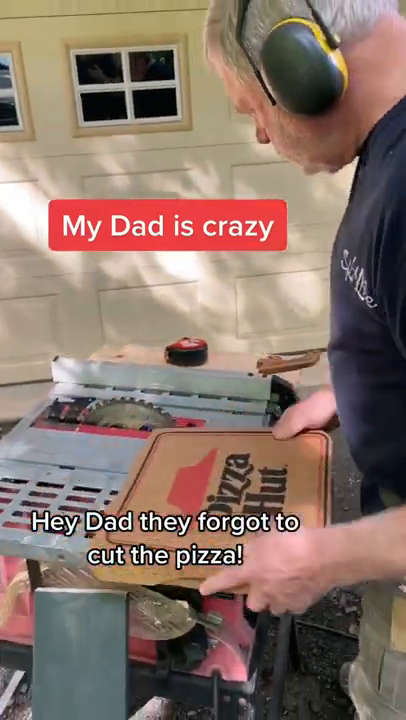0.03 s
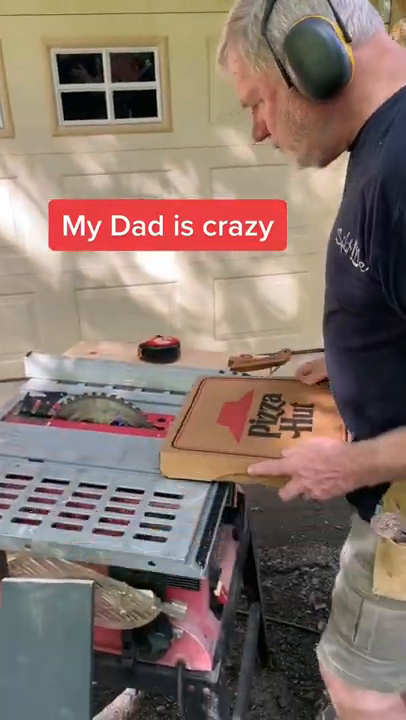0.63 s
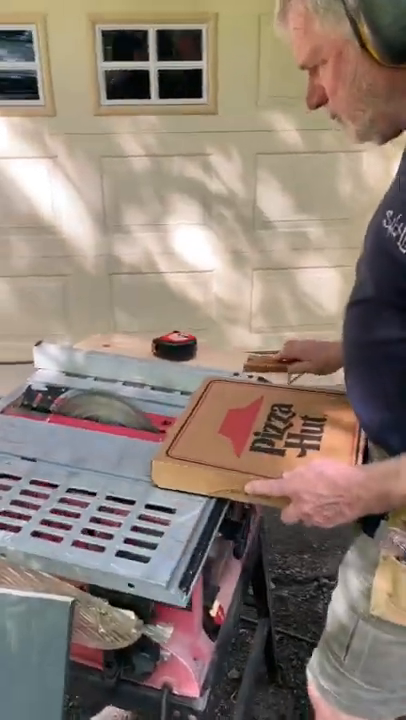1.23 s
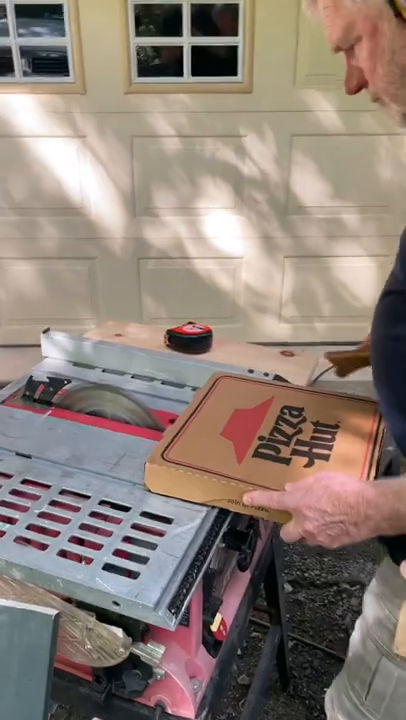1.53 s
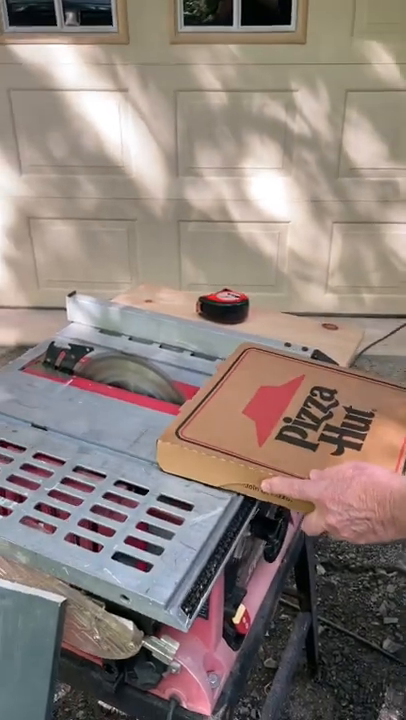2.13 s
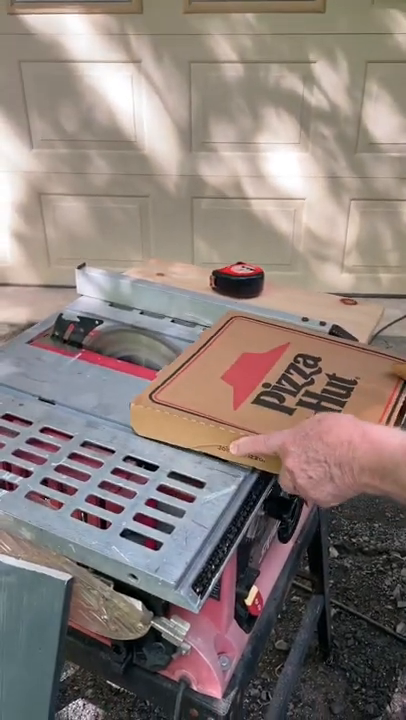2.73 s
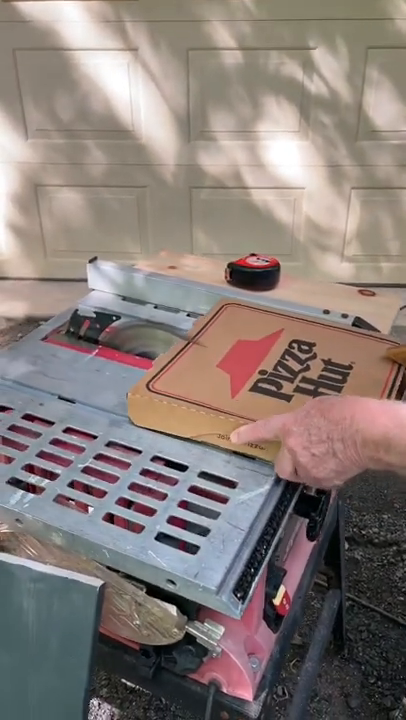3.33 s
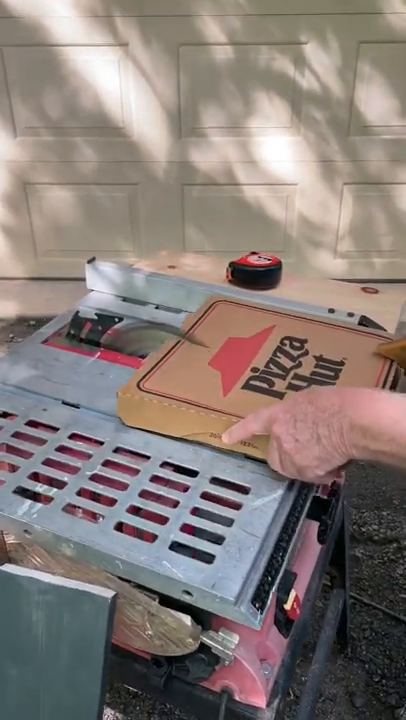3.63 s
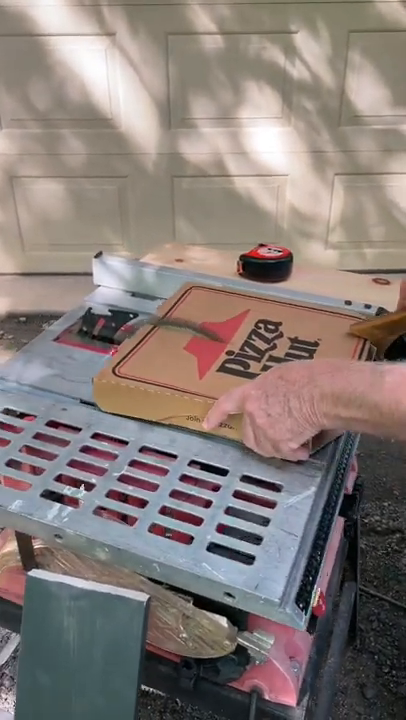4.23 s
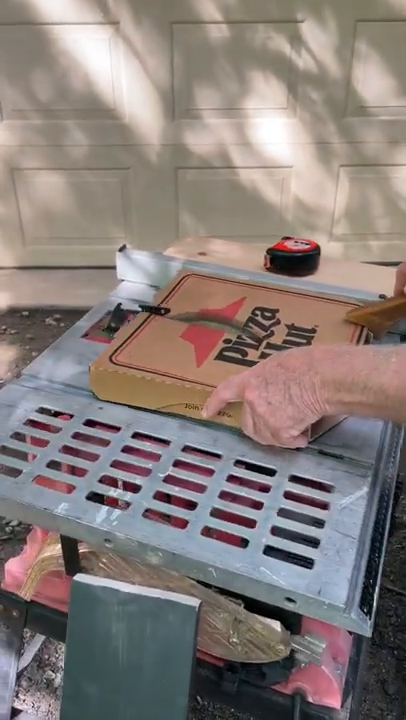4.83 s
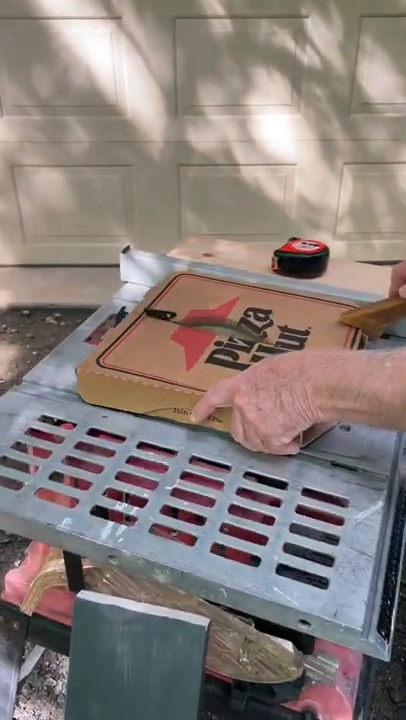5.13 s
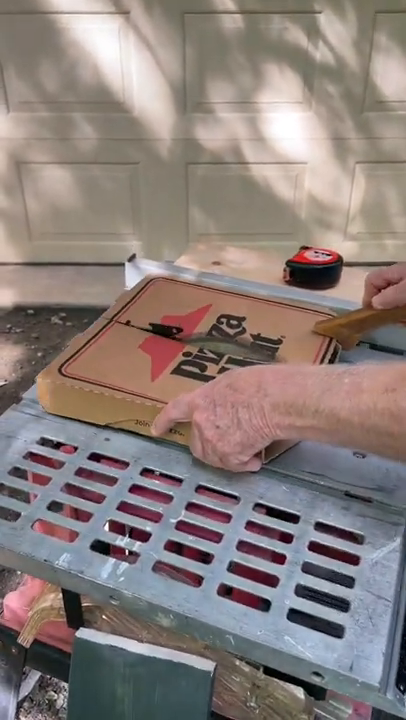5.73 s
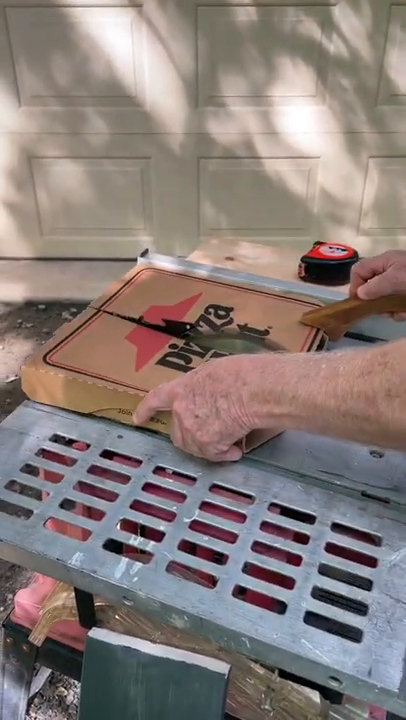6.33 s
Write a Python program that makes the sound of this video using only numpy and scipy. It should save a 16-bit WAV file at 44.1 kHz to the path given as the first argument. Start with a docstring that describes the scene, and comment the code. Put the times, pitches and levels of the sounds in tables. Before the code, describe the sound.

Against a faint, low outdoor background, a cardboard box scrapes softly over a ribbed metal table, with small squeaks and light knocks, until about 0.7 seconds. At 0.8 seconds a switch snaps and a table saw starts with a thud, a loud electric hum and a brief metallic ring. The motor roars upward in pitch, its gears grinding and howling. At 2.5 seconds it reaches full speed: the roar falls back abruptly, and a short, loud shriek settles into a high, wavering whine over steady rushing air. From about 3.8 seconds the blade enters the box, and the whine surges several times, most strongly near 4.7 seconds. A rasping, buzzing sound of shredding cardboard grows while the pitch sags slightly. The saw is still cutting at the end, around 6.4 seconds. Everything is heard in stereo from a hand-held microphone about a metre away.

```python
"""Cutting cardboard on a table saw

Outdoors, a cardboard box slides over a ribbed saw table. The switch snaps and the geared motor
starts with a hum and a roar. At full speed the roar falls back and the forty teeth of the blade
whine as they chop the air. The box is fed in, the teeth shred it, and the cut drags the speed down.
A hand-held pair of closely spaced microphones listens from about a metre away."""
import sys
import numpy as np
from scipy import signal
from scipy.fft import irfft
from scipy.io import wavfile
from scipy.ndimage import uniform_filter1d, map_coordinates

SR = 44100
rng = np.random.default_rng(int(sys.argv[2]) if len(sys.argv) > 2 else 0)


def to_wav(s):
    """Save 16-bit WAV."""
    ch = np.atleast_2d(s).T  # columns
    pcm = np.round(np.clip(ch, -1, 1) * 32767)  # PCM
    wavfile.write(sys.argv[1], SR, pcm.astype(np.int16))


N = 285327
TIME = np.arange(N) / SR
FREQS = np.maximum(np.arange(N // 2 + 1) * SR / N, 1)
SIDES = np.array([[1], [-1]])   # left, right

TEETH, GEAR_RATIO = 40, 41 / 9   # the motor shaft turns GEAR_RATIO times per blade turn
MAINS_HZ, SWITCH_ON_S, UP_TO_SPEED_S = 60, 0.8, 2.5
MAINS_ANGLE = 2 * np.pi * MAINS_HZ * TIME

# stereo width of the yard, the sliding box and the start: f/Hz, side compared with middle/dB
START_WIDTH = [(60, -42), (200, -79), (360, -12.5), (640, -9.5), (2100, -10.5), (3800, -4), (6900, 0),
               (12500, 6)]
# stereo width of the rushing air and the cut: f/Hz, side compared with middle/dB
RUNNING_WIDTH = [(60, -49), (360, -27.5), (2200, -100), (2800, 1.5), (4200, -9), (6900, 2), (9000, 4),
                 (12500, 47)]


def from_db(db):
    """Turn decibels into a gain."""
    return 10 ** (np.asarray(db) / 20)


def rms_one(x):
    """Scale a signal so that its average strength (rms) is 1."""
    return x / np.sqrt(np.mean(np.abs(x) ** 2) + 1e-20)


def in_time(rows):
    """Join (time, values...) points with straight lines, one curve per value."""
    times, *columns = np.transpose(rows)
    return [np.interp(TIME, times, column) for column in columns]


def colour(points):
    """Gain at every frequency, from points of f/Hz, level/dB."""
    hz, db = np.transpose(points)
    return from_db(np.interp(np.log(FREQS), np.log(hz), db))


def peak(x, centre, width):
    """A hump that is 1 at its centre and half as high half a width away."""
    return 1 / (1 + (2 * (x - centre) / width) ** 2)


def swell(start, length):
    """A smooth rise and fall: half a sine wave."""
    return np.sin(np.pi * np.clip((TIME - start) / length, 0, 1))


def envelope(start, attack_s, hold_s, fall_db_per_s):
    """Rise, hold until hold_s after the start, then die away."""
    age = TIME - start
    return np.clip(age / attack_s, 0, 1) * from_db(-fall_db_per_s * np.maximum(age - hold_s, 0))


def white():
    """The spectrum of white noise."""
    return rng.standard_normal(len(FREQS)) + 1j * rng.standard_normal(len(FREQS))


def drift(rate_hz, step=32):
    """A random wander of strength 1, mostly slower than rate_hz."""
    hz = np.arange(N // step) * SR / N
    coarse = irfft(rng.standard_normal((len(hz), 2)) @ [1, 1j] / (1 + (hz / rate_hz) ** 2))
    return rms_one(np.interp(np.arange(N) * len(coarse) / N, np.arange(len(coarse)), coarse))


def unsteady():
    """A restless gain that roughens a tone."""
    return rms_one(1 + .33 * drift(25))


def flutter(rate_hz):
    """A random gain and phase that smear a tone into a narrow band of noise."""
    return rms_one(drift(rate_hz) + 1j * drift(rate_hz))


def partials(angle, tones):
    """Tones at whole multiples of a rotation, each wavering in level on its own."""
    return sum(np.sqrt(2) * from_db(db + 2.5 * drift(7)) * np.cos(k * angle + rng.uniform(0, 2 * np.pi))
               for k, db in tones)


def resonant_noise(hz, width_hz):
    """Noise of strength 1, gathered around one pitch."""
    off_pitch = (FREQS ** 2 - hz ** 2) / (FREQS * width_hz)
    return rms_one(irfft(white() / (1 + off_pitch ** 2), N))


def saw_noise(spectrum, width, direct=0.98, lean=0.85):
    """Stereo noise coloured by the cabinet; the lows lean left and the treble arrives there first."""
    # resonances of cabinet and table: f/Hz, width/Hz, boost/dB
    cabinet = [(296, 87, -2), (745, 82, 6), (832, 39, -2.5), (1250, 35, -0.5)]
    shape = colour(spectrum) * from_db(sum(db * peak(FREQS, hz, wide) for hz, wide, db in cabinet))
    shared = lean / (1 + (FREQS / 1200) ** 4) + 1j * np.sqrt(direct) * np.minimum(FREQS / 8000, 1)
    diffuse = np.sqrt(np.clip(1 - np.abs(shared) ** 2, 0, 1))
    source = white()
    mid = irfft(shape * source, N)
    side = irfft(shape * colour(width) * (shared * source + diffuse * white()), N)
    return (mid + side * SIDES) / np.std(mid)


def shifting(x, depth_db, count=25, size=512):
    """Patches of the spectrum, some 150 Hz wide and `count` frames of 6 ms long, swell and fade."""
    frames = signal.stft(x, nperseg=size)[2]
    patches = rng.standard_normal(frames.shape[-2:])
    for _ in range(2):
        patches = uniform_filter1d(uniform_filter1d(patches, size=2, axis=0), size=count, axis=1)
    gain = rms_one(from_db(depth_db * np.tanh(rms_one(patches))))
    return signal.istft(frames * gain, nperseg=size)[1][..., :N]


def yard(level_db=-59):
    """A faint, low outdoor background."""
    # its spectrum: f/Hz, relative level/dB
    spectrum = [(30, -26), (110, 11.5), (400, -6), (3000, -30), (12000, -40)]
    return from_db(level_db) * saw_noise(spectrum, START_WIDTH)


def sliding_box(level_db=-47, stop_s=0.66, fall_db_per_s=103):
    """Cardboard scrapes along until it comes to rest, and the table's ribs sing under it."""
    # harder pushes on the box: start/s, length/s, level/dB
    pushes = [(0.127, 0.32, -47.5), (0.567, 0.065, -57)]
    # spectrum of the scrape: f/Hz, relative level/dB
    spectrum = [(100, 4), (400, 1), (850, -2), (1300, -5), (5000, -15), (12000, -29.5)]
    # gliding notes of the ribs: start/s, length/s, first f/Hz, last f/Hz, level/dB
    zips = [(0.152, 0.065, 750, 936, -45), (0.193, 0.037, 557, 620, -44), (0.247, 0.139, 442, 370, -46.5),
            (0.45, 0.12, 2100, 1650, -50)]
    level = from_db(level_db - fall_db_per_s * np.maximum(TIME - stop_s, 0))
    level = level + sum(from_db(db) * swell(start, length) for start, length, db in pushes)
    level = level * from_db(1.3 * drift(60))
    out = level * shifting(saw_noise(spectrum, START_WIDTH), depth_db=5, count=5)
    for start, length, from_hz, to_hz, db in zips:
        pitch = np.interp(TIME, [start, start + length], [from_hz, to_hz]) * (1 + 0.015 * drift(154))
        tone = np.sqrt(2) * np.sin(2 * np.pi * np.cumsum(pitch) / SR)
        out = out + from_db(db) * swell(start, length) * unsteady() * tone
    return out


def blade_rings(width_hz=60, rasp=0.14):
    """The blade's plate rings when jolted or pinched, rasping as it chatters."""
    # each ring: start/s, length/s, f/Hz, level/dB
    rings = [(0.0, 0.25, 3620, -64), (0.804, 0.055, 2350, -28), (0.807, 0.1, 4450, -29.5),
             (1.024, 0.072, 4450, -28.5), (0.848, 0.57, 4400, -33.5), (4.792, 0.13, 3710, -41),
             (4.793, 0.12, 4070, -36)]
    ringing = sum(from_db(db) * swell(start, length) * resonant_noise(hz, width_hz)
                  for start, length, hz, db in rings)
    return ringing * rms_one(1 + rasp * drift(90))


def knocks():
    """The box knocks on the table, the switch snaps and thuds, and the motor's brushes spit."""
    # short bursts of noise: t/s, f/Hz, width/Hz, decay/s, level/dB
    bursts = [(0.43, 745, 120, 0.012, -35.5), (0.564, 580, 300, 0.03, -41), (0.581, 800, 456, 0.018, -39),
              (0.631, 195, 260, 0.018, -38), (0.796, 4360, 7000, 0.0017, -27.5),
              (0.793, 600, 900, 0.0078, -32), (0.802, 710, 696, 0.015, -19),
              (0.808, 5470, 4000, 0.014, -43), (0.894, 5730, 3000, 0.021, -29)]
    out = 0
    for start, hz, width_hz, decay, db in bursts:
        age = np.maximum(TIME - start, 0) / decay
        out = out + from_db(db) * 2 * (np.exp(-age) - np.exp(-5 * age)) * resonant_noise(hz, width_hz)
    return out


def start_up(level_db=-14.5, hold_s=0.18, sag_db_per_s=28.5):
    """The starting current hums in the windings and shakes the cabinet twice per mains cycle."""
    # spectrum of the shaking cabinet: f/Hz, relative level/dB
    spectrum = [(30, -20), (170, -6.5), (320, 2.5), (430, -9.5), (830, -2), (1050, -6.5), (1600, -7),
                (2300, -5.5), (3100, -17.5), (6000, -55)]
    # hum of the windings: multiple of the mains frequency, relative level/dB
    hum_tones = [(2, -21), (3, -7), (4, -13.5), (5, -5), (6, -12), (8, -16.5), (9, -16), (12, -17.5),
                 (13, -14), (14, -14)]
    rattle = saw_noise(spectrum, START_WIDTH) * (1 + .25 * np.cos(2 * MAINS_ANGLE))
    hum = partials(MAINS_ANGLE + .02 * drift(15), hum_tones)
    level = from_db(level_db - sag_db_per_s * np.clip(TIME - SWITCH_ON_S, 0, hold_s))
    return level * envelope(SWITCH_ON_S, 0.028, hold_s, fall_db_per_s=65) * (rattle + hum)


def blade_speed(aim_turns_per_s=82.8, half_way_s=0.352):
    """Blade turns per second: the climb flattens out until it meets the working speed."""
    # teeth passing at working speed, dragged down by the cut: t/s, f/Hz
    tooth_rate = [(2.52, 2756), (2.65, 2777), (2.8, 2782), (3.2, 2783), (3.6, 2791), (3.9, 2778),
                  (4.55, 2736), (5.0, 2688), (5.6, 2648), (6.05, 2640), (6.25, 2661), (6.44, 2669)]
    age = np.maximum(TIME - SWITCH_ON_S, 0)
    return np.minimum(aim_turns_per_s * age / (age + half_way_s), in_time(tooth_rate)[0] / TEETH)


def gear_howl(width_hz=80):
    """The gearbox howls: a narrow band of noise whose pitch sags and climbs again."""
    # path of the howl: t/s, f/Hz, relative level/dB
    path = [(0.9, 2340, 3), (1.15, 2150, 12), (1.65, 1984, 0), (2.05, 2430, -6)]
    hz, db = in_time(path)
    angle = 2 * np.pi * np.cumsum(hz * (1 + .03 * drift(8))) / SR
    return from_db(db) * np.sqrt(2) * np.real(flutter(width_hz) * np.exp(1j * angle))


def gear_grinding(shaft, repeat=0.6, track_turns_per_s=200):
    """Gear noise glides up with the shaft's speed; part of it comes back every blade turn."""
    # noise bands: centre/multiples of shaft speed, width/multiples, relative level/dB
    bands = [(4.1, 0.6, -3), (5.9, 0.8, -4), (7.4, 0.7, -1), (8.55, 0.6, -1.5), (13.4, 1.6, -7),
             (20.5, 2, -12)]
    multiples = FREQS / track_turns_per_s
    shape = sum(from_db(db) * peak(multiples, k, wide) for k, wide, db in bands)
    recurring = 1 / (1 - repeat * np.exp(-2j * np.pi * multiples * GEAR_RATIO))
    track = irfft(white() * shape * recurring, N)
    position = shaft / (2 * np.pi) * SR / track_turns_per_s   # a faster shaft reads the noise faster
    return rms_one(map_coordinates(track, [position], order=1, mode="wrap"))


def motor_roar(shaft, pace, strain, torque, inrush_db=-24, roar_db=-22):
    """The brushes spark in the first rush of current; then the straining motor roars up with speed."""
    # spectrum of the brush noise: f/Hz, relative level/dB
    spectrum = [(150, -15), (400, -11), (760, -1), (1500, 0), (2100, -2), (2900, -0.5), (4000, -3),
                (5400, -6), (8000, -14), (11000, -21), (13000, -40)]
    inrush = from_db(inrush_db) * envelope(SWITCH_ON_S, 0.025, hold_s=0.15, fall_db_per_s=168)
    level = np.hypot(inrush, from_db(roar_db) * strain * pace ** 0.96)
    # stand, table and hollow cabinet each boom at their own pitch
    rumble = (from_db(-28) * resonant_noise(66, 22) + from_db(-29.5) * resonant_noise(140, 43)
              + from_db(-13.5) * resonant_noise(313, 225))
    gearbox = from_db(-14) * gear_howl() + from_db(-6) * gear_grinding(shaft)
    brushes = shifting(saw_noise(spectrum, START_WIDTH), depth_db=5, count=14)
    sparking = 1 + .1 * np.cos(2 * MAINS_ANGLE)
    return level * (brushes + torque * (rumble + gearbox)) * sparking


def air_rush(pace, strain, bite, level_db=-30.5, strain_db=6.5, covered_db=-2.5):
    """Air from fan and blade grows with speed: louder under strain, softer as the box covers it."""
    # spectrum of the air: f/Hz, relative level/dB
    spectrum = [(30, -44), (62, -8.5), (95, -54), (135, -6), (190, -14.5), (330, 0), (470, -4.5),
                (760, -4.5), (1250, 1), (1600, -2.5), (2500, 0.5), (3050, -5), (5000, -2.5), (7800, -10),
                (9200, -17.5), (11000, -31), (13000, -72)]
    air = shifting(saw_noise(spectrum, RUNNING_WIDTH), depth_db=2.4) * from_db(.5 * drift(7.3))
    return from_db(level_db + strain_db * strain + covered_db * bite) * pace ** 2.3 * air


def strain_whines(shaft, shaft_hz, torque, gain_db=-2):
    """The straining shaft turns unevenly; its tones swell as they climb through housing resonances."""
    # each tone: multiple of shaft speed, relative level/dB, resonance f/Hz, width/Hz
    tones = [(2, -39, 595, 50), (4, -30, 1215, 90), (7, -29, 1920, 240), (8, -33.5, 2080, 300),
             (9, -33, 2560, 260), (12, -30.5, 3380, 300), (14, -33, 3200, 300)]
    out = 0
    for k, db, hz, wide in tones:
        rasp = rms_one((1 + flutter(45)) * from_db(1.5 * drift(10)))
        tone = np.sqrt(2) * np.real(rasp * np.exp(1j * k * shaft))
        out = out + from_db(db) * tone / np.hypot(1, 2 * (k * shaft_hz - hz) / wide)
    return from_db(gain_db) * torque * out


def motor_tones(shaft, pace, strain, bite):
    """The windings hum, while the fan and the commutator (the motor's turning contacts) sing."""
    # hum while speeding up: multiple of the mains frequency, relative level/dB
    strain_hum = [(2, -37), (6, -37)]
    # hum at top speed: multiple of the mains frequency, level/dB
    running_hum = [(4, -55)]
    # fan and commutator: multiple of shaft speed, level running free/dB, level at full bite/dB
    tones = [(2, -50, -51), (3, -46.5, -48), (4, -56, -42.5), (7, -58, -42), (12, -51.5, -60),
             (14, -48, -50)]
    hum = strain * np.sqrt(1 - pace) * partials(MAINS_ANGLE, strain_hum)   # current falls with speed
    loaded = [(k, free_db + bite * (bite_db - free_db)) for k, free_db, bite_db in tones]
    return hum + pace ** 2 * (unsteady() * partials(shaft, loaded) + partials(MAINS_ANGLE, running_hum))


def unbalanced_shaft(shaft, shaft_hz, pace, torque, bite, level_db=-54.5, boom_hz=296):
    """The lopsided shaft's tone grows with speed and load, and swells where the cabinet booms."""
    load_db = 27.5 * torque + 16 * bite
    boom_db = 8 * peak(shaft_hz, boom_hz, width=19.4)
    level = from_db(level_db + load_db + boom_db + 0.25 * drift(11)) * pace ** 3.3
    return level * np.sqrt(2) * np.sin(shaft)


def motor(blade, speed, bite, easing_share=0.045):
    """The motor strains until it is up to speed; its torque (twisting force) eases near the top."""
    shaft, shaft_hz = blade * GEAR_RATIO, speed * GEAR_RATIO
    pace = speed / speed.max()
    strain = envelope(SWITCH_ON_S, 0.025, hold_s=UP_TO_SPEED_S - SWITCH_ON_S, fall_db_per_s=379)
    torque = strain * np.minimum((1 - pace) / easing_share, 1)
    return (motor_roar(shaft, pace, strain, torque) + air_rush(pace, strain, bite)
            + strain_whines(shaft, shaft_hz, torque) + motor_tones(shaft, pace, strain, bite)
            + unbalanced_shaft(shaft, shaft_hz, pace, torque, bite))


def free_running(blade, bite):
    """Tones of gear and blade fade in near full speed and give way as the teeth bite."""
    # each tone: multiple of blade speed, level/dB
    tones = [(18, -52), (33, -45), (41, -48), (60, -53), (79, -45.5)]
    return (1 - bite) * np.interp(TIME, [1.5, UP_TO_SPEED_S], [0, 1]) * partials(blade, tones)


def tooth_whine(blade, start_s=2.494, attack_s=0.013, fade_hz=22):
    """Teeth chop the air: a shriek, then a whine that wavers with echoes off moving surfaces."""
    # three tones, lowest first: steady level/dB, shriek level/dB, left lead/rad, fading depth/0-1
    tones = [(-29.5, -12.5, 0.36, 0.14), (-30.5, -31, 0.85, 0.29), (-33, -26.5, 2.17, 0.7)]
    # the lowest tone surges as the box passes over the blade: start/s, length/s, level/dB
    surges = [(3.783, 0.31, -30.5), (4.204, 0.34, -26), (4.517, 0.073, -30), (4.592, 0.17, -21),
              (4.738, 0.17, -24.5), (5.946, 0.095, -36), (6.133, 0.11, -29)]
    # dips (swells if negative): t/s, half length/s, loss of tone 1/dB, of tone 2/dB, of tone 3/dB
    dips = [(2.563, 0.025, -1, 13, 6), (2.68, 0.035, 5, 1, -6.5), (2.75, 0.051, -2, 9, -7),
            (2.81, 0.019, 8, -6, 0), (2.885, 0.033, 10, -2, -1), (3.03, 0.086, 5.5, -1, 1.5),
            (3.253, 0.065, 28, 2.5, 8), (3.4, 0.047, 6, 15, 5), (3.85, 0.14, 0.5, 5, 4.5),
            (4.05, 0.031, 0.5, 28, -4), (4.145, 0.016, -0.5, 18, 3), (4.45, 0.011, -1, 13, -9),
            (4.505, 0.018, 7, -4, 5), (4.603, 0.017, 10, 8, -5), (4.795, 0.027, 3.5, 9, 6),
            (4.912, 0.036, 2.5, 18, 2), (5.0, 0.085, -2.5, 7, 9), (5.48, 0.19, -1.5, -1, -4),
            (5.8, 0.14, 23, -1, 3), (5.99, 0.04, 0, 12, -2), (6.107, 0.033, 12, 1, 5),
            (6.26, 0.028, 8, 24, 1), (6.45, 0.042, -1.5, 26, 5)]
    # the lowest tone shifts sideways as the microphones move: t/s, left minus right/dB
    sway = [(2.5, -1), (2.64, -9), (3.13, -2), (3.42, -1.5), (5.38, -4.5), (5.51, -15), (5.92, 10.5),
            (6.3, -1.5)]
    onset = np.clip((TIME - start_s) / attack_s, 0, 1)
    shriek = envelope(start_s, attack_s, hold_s=attack_s, fall_db_per_s=143)
    surge = sum(from_db(db) * swell(start, length) for start, length, db in surges)
    loss_db = sum(np.outer(losses, np.exp(-((TIME - t) / half) ** 2)) for t, half, *losses in dips)
    balance = rms_one(from_db(SIDES * in_time(sway)[0] / 2))
    tooth_angle = TEETH * blade + .05 * drift(60)
    out = 0
    for k, (steady_db, shriek_db, lead, depth) in enumerate(tones, 1):
        level = from_db(steady_db) * onset + from_db(shriek_db) * shriek
        if k == 1:
            level = (level + surge) * balance
        fading = rms_one(1 + depth * (drift(fade_hz) + 1j * drift(fade_hz)))
        wobble = 1 + .035 * k * np.cos(blade)   # the blade wobbles slightly on every turn
        tone = np.sqrt(2) * np.real(fading * np.exp(1j * (k * tooth_angle + SIDES * lead / 2)))
        out = out + level * from_db(-loss_db[k - 1]) * wobble * tone
    return out


def bite_depth(speed, power=1.34):
    """How hard the teeth bite, from 0 to 1: it goes with the speed that the blade has lost."""
    lost = np.maximum.accumulate(speed) - speed
    return (lost / lost.max()) ** power


def cut(blade, bite, shred_db=-34.5):
    """The deeper the bite, the more the teeth shred the cardboard and their unevenness buzzes."""
    # spectrum of the shredding: f/Hz, relative level/dB
    spectrum = [(50, -34), (130, -5), (400, 1.5), (700, 2), (1250, 5.5), (1700, 5), (2450, 3.5),
                (3200, 2.5), (4800, -13), (6600, -6.5), (8200, 0), (12000, -49)]
    # the buzz at full bite: multiple of blade speed, level/dB
    buzz = [(10, -43), (12, -50), (15, -47), (25, -47), (31, -49.5), (32, -55), (36, -46), (39, -40),
            (78, -44), (79, -41.5), (100, -49)]
    chop = 1 + .15 * np.cos(blade)
    shred = from_db(shred_db) * saw_noise(spectrum, RUNNING_WIDTH) * chop * from_db(drift(30))
    return bite * (shred + unsteady() * partials(blade, buzz))


def scene():
    """Add up all the sounds; one blade speed drives everything that turns."""
    speed = blade_speed()
    blade = 2 * np.pi * np.cumsum(speed) / SR   # angle turned, in radians
    bite = bite_depth(speed)
    return (yard() + sliding_box() + knocks() + start_up() + blade_rings() + motor(blade, speed, bite)
            + tooth_whine(blade) + cut(blade, bite) + free_running(blade, bite))


def record(dry, ceiling=0.96, cutoff_hz=13100):
    """Round off the tallest peaks and cut away the highest treble."""
    rounded = dry / (1 + (dry / ceiling) ** 6) ** (1 / 6)
    return signal.sosfilt(signal.cheby2(18, 50, cutoff_hz, fs=SR, output="sos"), rounded)


dry = scene()
out = record(dry)
to_wav(out)
```